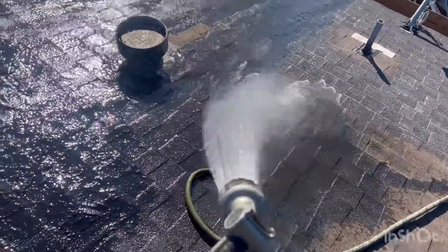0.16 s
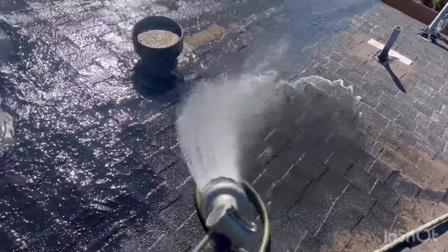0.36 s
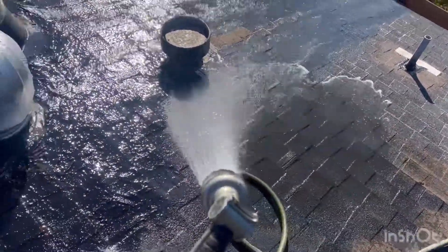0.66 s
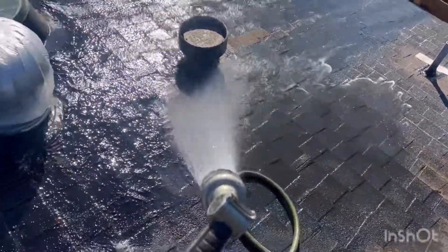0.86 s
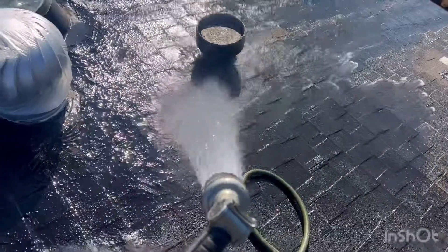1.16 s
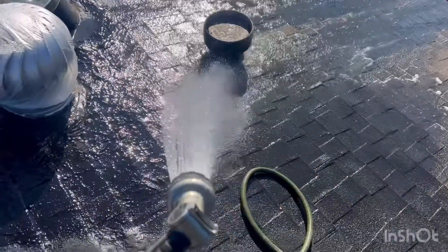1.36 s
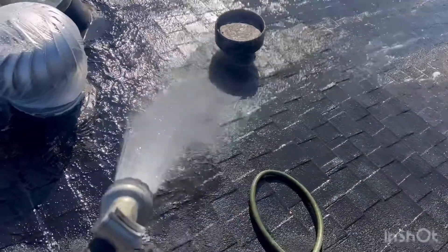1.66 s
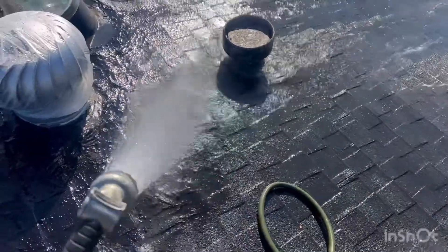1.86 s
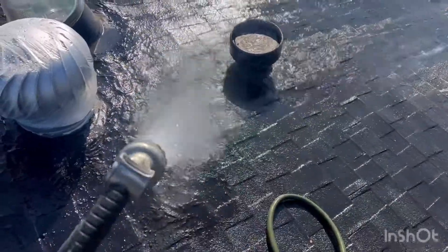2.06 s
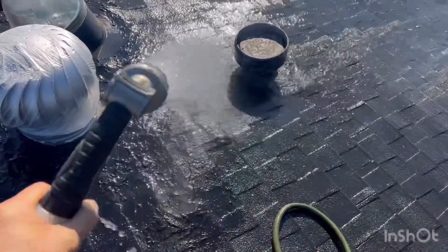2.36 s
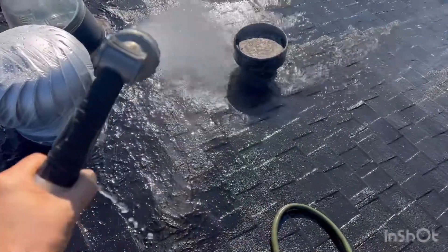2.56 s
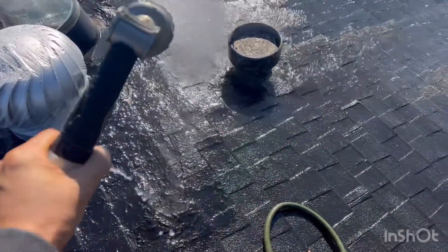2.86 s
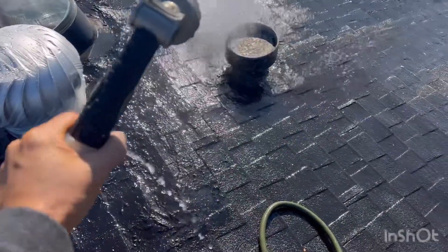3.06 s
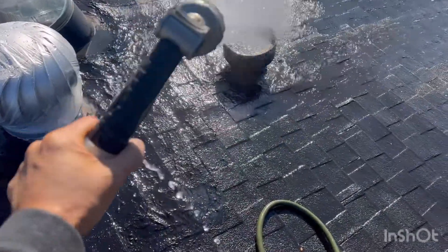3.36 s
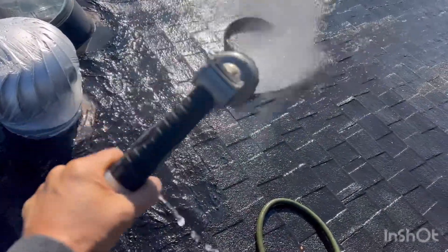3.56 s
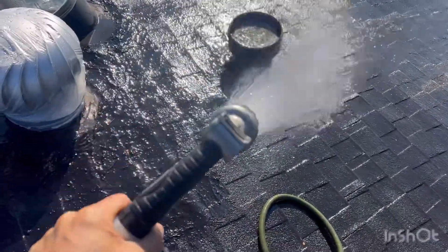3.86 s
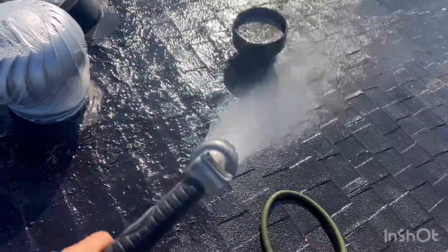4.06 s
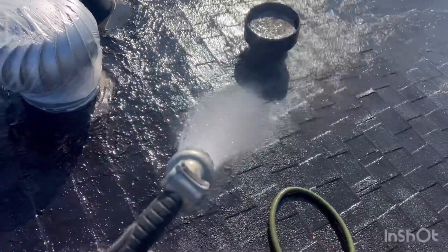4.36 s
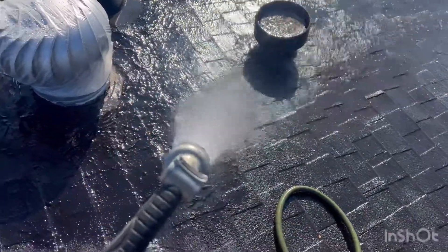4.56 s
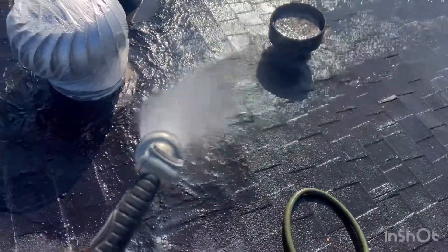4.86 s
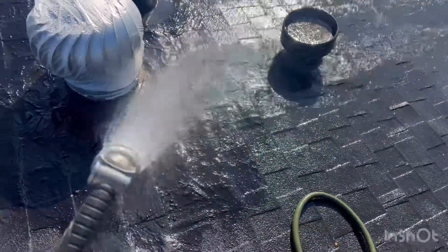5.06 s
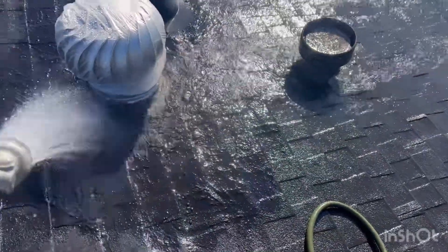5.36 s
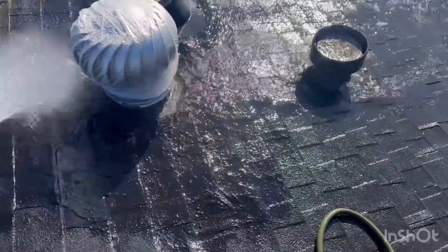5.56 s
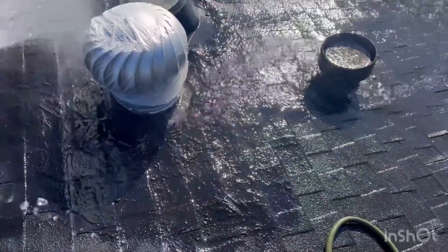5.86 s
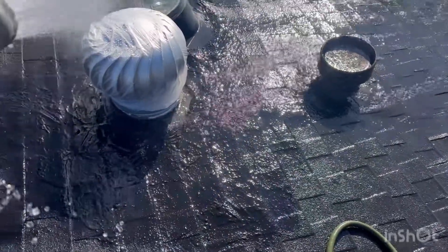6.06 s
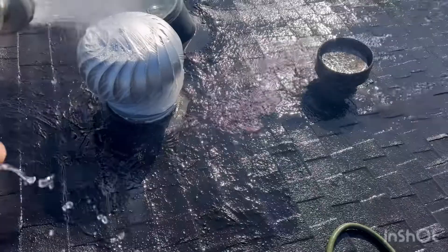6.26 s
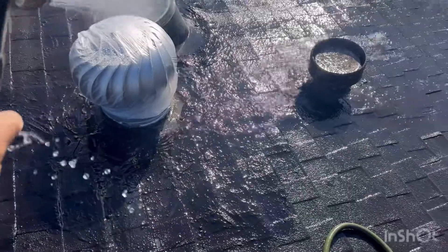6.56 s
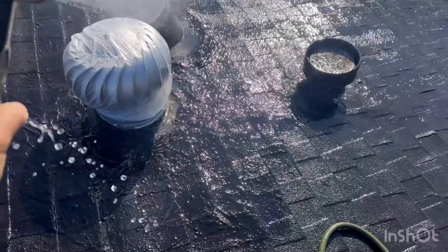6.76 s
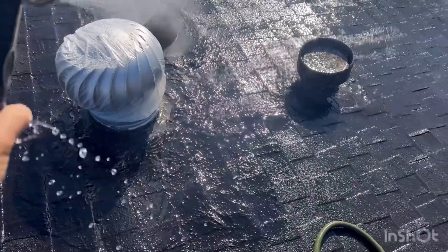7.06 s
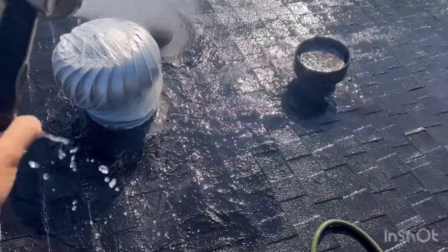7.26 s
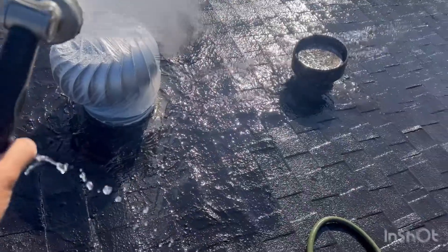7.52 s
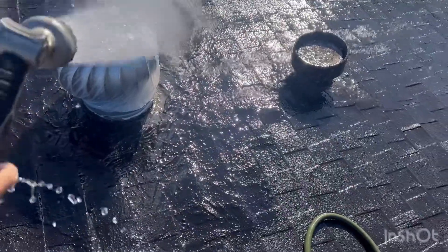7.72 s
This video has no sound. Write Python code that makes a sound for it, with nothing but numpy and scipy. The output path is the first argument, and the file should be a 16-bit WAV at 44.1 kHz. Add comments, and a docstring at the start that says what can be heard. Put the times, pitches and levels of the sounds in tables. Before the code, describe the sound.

A hose nozzle sprays water onto roof shingles outdoors, making a steady hiss close to the microphone. Its tone shifts as the spray moves, and a few stray drops tick nearby. Past the middle the hiss swings toward the left, then swells much louder as the water strikes a sheet-metal vent at the end. Soft wind bumps, a distant machine hum and low town rumble sit faintly underneath.

```python
"""Hosing down a roof

A nozzle sprays a fan of water over shingles, close to a hand-held camera with two microphone ports.
Countless droplet hits melt into a hiss that swings from straight ahead to the left, then strikes a
sheet-metal vent and swells. Stray drops tick nearby, wind bumps softly on the ports, and a distant
machine hums over low town rumble."""
import sys
import numpy as np
from scipy import signal
from scipy.fft import rfft, irfft, next_fast_len
from scipy.io import wavfile
from scipy.ndimage import uniform_filter1d

SR = 44100
rng = np.random.default_rng(int(sys.argv[2]) if len(sys.argv) > 2 else 0)


def store_wav(level_fs):
    """Save 16-bit WAV to argv[1]."""
    pcm = np.round(np.clip(np.atleast_2d(level_fs), -1, 1) * 32767)
    wavfile.write(sys.argv[1], SR, pcm.T.astype(np.int16))


N = 347949
FRAME, HOP = 512, 128  # the spray is shaped in short overlapping slices; sizes in samples


def spray():
    """Water hitting the roof: a hiss whose tone and direction follow where the nozzle points."""
    # base loudness of the hiss between 5 and 9.5 kHz: t/s, level/dB
    loudness = [(0, -41), (.35, -39), (.8, -39.5), (1.28, -41), (1.44, -38), (1.6, -42), (1.76, -41),
                (2.0, -43), (2.35, -39.5), (2.6, -41), (3.2, -43), (3.7, -43), (4.0, -38.5), (4.32, -39),
                (4.6, -41), (5.13, -39), (5.4, -34), (5.51, -39.5), (5.67, -33), (5.92, -43), (6.19, -36),
                (6.6, -40), (6.76, -38), (7.06, -43), (7.3, -38.5), (7.55, -28), (7.78, -22), (7.89, -19.5)]
    # boosts to the low, middle and top of the hiss: t/s, splash/dB, patter/dB, mist/dB
    balance = [(0, 0.5, 0.5, 0), (.45, 0.8, -3.5, -1.5), (.8, 0.5, -1, 1), (1.3, 1.5, -1, 0.5),
               (2.05, 2, -0.5, 1.5), (2.4, -2, 4, 2), (2.6, 0, 4.5, -1), (2.95, 1.5, 1, -2),
               (3.35, 4, 3, 0.5), (3.5, 5, 4.5, 0), (3.66, 3, 1.5, 0), (4.0, 0, -1, 0.5),
               (4.5, 1.5, -0.5, 1), (5.1, -1, -3, 2), (5.44, -7.5, -4.5, 2.5), (5.68, 0.2, -2.3, 1),
               (5.85, 1.5, 0.7, 2.5), (6.15, 2.5, -2, 3), (6.5, 4, 1.5, 1), (7.25, 2.1, 2, 1),
               (7.55, 0.5, 1, 4), (7.89, 0.5, 2.5, 2)]
    # where the nozzle points: t/s, aim (0 shingles ahead, 1 shingles on the left, 2 metal vent)
    aim_path = [(0, 0.02), (4.9, 0.018), (5.5, 1.34), (7.25, 1.5), (7.6, 1.98), (7.89, 1.97)]
    # how the tone shifts as the nozzle swings: t/s, whistle pitch/ratio, boost near 6.4 kHz/dB,
    # extra head start of the left port near 2.6 kHz/rad, dip centre/Hz, gain at the dip/dB
    swing = [(0, 0.97, -1, -0.36, 3000, 4.5), (.6, 0.99, -0.5, -0.041, 3100, -2.5),
             (1.45, 0.99, 0.5, 0.077, 2940, -1), (2.0, 0.96, -1, 0.61, 2660, -4.5),
             (2.4, 0.98, 2.5, 0, 2500, -3.5), (2.9, 0.95, 2, 0.48, 2250, -8),
             (3.3, 0.98, 1.5, 0, 2250, -2.5), (3.5, 1.05, 4.5, -0.041, 2300, -3),
             (3.66, 1, -3.5, -0.19, 2500, -1), (4.15, 1.04, -4, -0.43, 2800, -1), (4.6, 1, -2, 0, 2980, -3),
             (4.95, 0.97, -1, .3, 2900, -7), (5.25, 1.02, -6.5, 0.43, 2750, -8),
             (5.45, 1.06, -0.5, 0.55, 2300, -2), (6.1, 0.9, -0.3, 0.61, 2230, -0.5),
             (6.5, 0.98, 1, -0.35, 2760, -3.5), (6.9, 0.98, -1, 0, 2600, -0.5),
             (7.2, 0.97, -1.5, -.3, 2810, -6), (7.6, 1.02, -1.2, -0.016, 2650, -2.5),
             (7.89, 1.0, 2, -0.17, 2400, 0)]
    hz, t, shared_hiss = droplet_hiss(scatter_db=.2)
    right_hiss = droplet_hiss(scatter_db=2.5)[2]
    level_db = curves(loudness, t)[0]
    splash_db, patter_db, mist_db = curves(balance, t)
    aim = curves(aim_path, t)[0]
    pitch, bright_db, extra_lead, dip_hz, dip_db = curves(swing, t)

    whistle_db = -.9 + .9 * patter_db + .54 * splash_db
    # the splash boost is taken off the whistle here because the whole low end gets it below
    left, right, cross = struck_surfaces(hz, aim, whistle_db - splash_db, pitch)
    alike = cross / np.sqrt(left * right + 1e-30) * np.exp(-1j * extra_lead * bell(hz, 2600, 3000))
    apart = np.sqrt(np.clip(1 - abs(alike) ** 2, 0, 1))
    core = (hz > 5000) & (hz < 9500)
    core_power = np.sum((left + right)[core] / 2, axis=0) / (len(hz) - 1)

    low = np.clip((2200 - hz) / 500, 0, 1)[:, None]
    middle = np.clip((5800 - hz) / 1200, 0, 1)[:, None] - low
    top = np.clip((hz - 9800) / 1200, 0, 1)[:, None]
    mist_db = mist_db + np.interp(aim, range(3), (2, -1.8, -2))  # less mist once the fan points away
    balance_db = low * splash_db + middle * patter_db + top * mist_db
    swing_db = bell(hz, 6400, 2600) * bright_db + bell(hz, dip_hz, 670) * dip_db
    passing_db = turning_sweep(hz, t) + pipe_ring(hz, t)
    gain = undb(level_db + balance_db + swing_db + passing_db + fan_flicker(hz, t)) / np.sqrt(core_power)
    at_left = np.sqrt(left) * shared_hiss
    at_right = np.sqrt(right) * (alike * shared_hiss + apart * right_hiss)
    pair = gain * np.array([at_left, at_right])
    return signal.istft(pair, SR, nperseg=FRAME, noverlap=FRAME - HOP)[1][:, :N]


def droplet_hiss(scatter_db, large_per_s=170):
    """Tiny uneven hits blur into hiss as larger ones patter through. Gives frequencies, times, slices."""
    hits = rng.standard_normal(N) * undb(scatter_db * wander(900, (1, N))[0])
    is_large = rng.random(N) < large_per_s / SR
    large_db = 11 + 7 * rng.random(N)
    hits = np.where(is_large, np.sign(hits) * undb(large_db), hits)
    return signal.stft(hits / hits.std(), SR, nperseg=FRAME, noverlap=FRAME - HOP)


def struck_surfaces(hz, aim, whistle_db, pitch):
    """Each surface colours the hiss its own way; the aim blends their left, right and shared power."""
    # tone of each surface at the two ports: f/Hz, left/dB, right/dB, likeness (0 to 1)
    ahead_tone = [(250, -2, 2.5, 0), (452, -1.5, -3.5, 0.17), (780, -7.5, -3.5, 0.4),
                  (1350, -4, -2.5, 0.93), (1770, -6.5, -3, 0.6), (2400, -2, 0, 0.55),
                  (2980, -3, -3.5, 0.07), (3900, -3.5, -5.5, 0.6), (4930, -3.5, -6.5, 0.67),
                  (5500, -1.5, -4.5, 0), (6450, -2.5, -3.5, 0.7), (7760, 3, 2.5, 0.02),
                  (8450, 2.5, 1.5, 0.86)]
    left_tone = [(250, 1.5, 2, 0.71), (465, -3.5, -5.5, 0.21), (800, -2.5, -4, 0.65), (1390, 2, 2.5, 0.68),
                 (1800, -2, 2.5, 1), (2390, -3.5, -3.5, 0.49), (3080, -2.5, -4, 0.85), (3900, -1, -8, 0.37),
                 (4730, -0.5, -5, .29), (5400, 1.5, -11, 0.2), (6250, 1, -1, 0.47), (7850, 2.5, 2.5, 0.49),
                 (8550, 4.5, -0.5, 0.89)]
    vent_tone = [(190, -3.5, -6, 0.99), (437, -0.5, -3, 0.99), (670, -7, -6, 0.93), (1410, -2.5, -2, 0.9),
                 (1800, -14.5, -6.5, 0.89), (2390, -3, -3, 0.7), (3070, 3, -4, 0.76),
                 (3820, -4.5, -10, 0.48), (4700, -1.5, -15, .45), (5500, 0, -6.5, 0.51),
                 (6400, -0.5, -1, 0.82), (7600, -0.5, 1, 0.74), (8200, 1, -4.5, 0.94)]
    # pitches that the hiss sets ringing, the nozzle's whistle first: f/Hz, width/Hz, boost/dB
    ahead_rings = [(1382, 276, 9.5), (2510, 100, -2.5), (5870, 1100, 1.5)]
    left_rings = [(1440, 250, 5.4), (1980, 250, 3), (2530, 116, 12.7), (3000, 430, 6.4), (3570, 180, 5),
                  (7700, 350, 1)]
    vent_rings = [(1554, 154, 11.5), (2010, 370, 11.5), (2780, 490, 0.5), (3120, 300, 1), (3640, 180, 4),
                  (4470, 460, 3), (5880, 290, 3.5), (6500, 250, 1), (6840, 250, 1), (7570, 500, 3),
                  (8140, 250, 4), (8900, 1060, 7)]
    # head start of the wave at the left port: f/Hz, spray ahead/rad, spray on the left/rad
    head_start = [(250, -.4, 0), (800, -.4, .3), (1400, .4, 1.2), (2050, .5, 2.1), (2400, .8, 2.9),
                  (3100, 1.6, 3.5), (3900, 1.3, 6.1), (4700, .3, 5.5), (5500, .3, 5.1), (6400, .1, 6),
                  (7500, .8, 7), (8400, 0, 6.28)]
    from_ahead, from_left = curves(head_start, hz)
    surfaces = [(ahead_tone, ahead_rings, from_ahead), (left_tone, left_rings, from_left),
                (vent_tone, vent_rings, from_left)]
    blend = 0
    for k, (tone, rings, lead) in enumerate(surfaces):
        share = np.clip(1 - abs(aim - k), 0, 1)
        blend = blend + share * power_at_ports(hz, tone, rings, lead, whistle_db, pitch)
    left, right, cross = blend
    return left.real, right.real, cross


def power_at_ports(hz, tone, rings, lead, whistle_db, pitch, treble_lag_s=1 / 3600):
    """One surface's left, right and shared (cross) power; its treble is one signal, with the right channel
    slightly ahead of the left."""
    # the ports' own resonance and the treble above it: f/Hz, gain/dB
    treble = [(8400, 0), (9000, 1.3), (9600, -.7), (10100, -3.8), (10600, -8.5), (11100, -11.5),
              (11800, -13.5), (12800, -13), (14000, -10), (15000, -7.3), (16000, -6.5)]
    f, left_db, right_db, likeness = np.transpose(tone)
    above_hz = np.maximum(hz - f[-1], 0)  # how far past the tone table's last row
    most_alike = np.where(above_hz > 0, .9, 1)
    alike = np.clip(np.interp(hz, f, likeness) + above_hz / 9000, 0, most_alike)
    lead = lead - 2 * np.pi * above_hz * treble_lag_s
    # the treble evens out to the same level at both ports
    even_db = np.clip(above_hz / 600, 0, 1) * (left_db[-1] - right_db[-1]) / 2
    left = undb(np.interp(hz, f, left_db) - even_db)
    right = undb(np.interp(hz, f, right_db) + even_db)
    cross = left * right * alike * np.exp(-1j * lead)
    whistle_hz, whistle_width, rest_db = rings[0]
    rings_db = sum(db * bell(hz, centre, width) for centre, width, db in rings[1:])
    rings_db = rings_db + (rest_db + whistle_db) * bell(hz, whistle_hz * pitch, whistle_width)
    treble_db = curves(treble, hz)[0][:, None]
    bass_cut = (hz ** 2 / (hz ** 2 + f[0] ** 2))[:, None]
    power = undb(treble_db + rings_db) ** 2 * bass_cut
    return power * np.array([left ** 2, right ** 2, cross])[:, :, None]


def fan_flicker(hz, t):
    """As the fan of water wavers, patches of the hiss grow louder and softer at random (in dB)."""
    step_s = HOP / SR
    centres_hz = np.arange(17) * 1000
    patches = np.clip(1 - abs(hz[:, None] - centres_hz) / 1000, 0, 1)
    size = (len(centres_hz), len(t))
    flicker_db = patches @ (.6 * wander(24, size, step_s) + 1.5 * wander(70, size, step_s))
    flicker_db *= np.interp(hz, (6500, 8000), (.6, 1))[:, None]  # calmer below about 7 kHz
    # narrow bands above 2.5 kHz drift slowly as the jet moves
    band = np.minimum(hz // 400, 40).astype(int)
    drift = uniform_filter1d(wander(3, (41, len(t)), step_s)[band], 3, axis=0)
    drift_db = 1.1 * drift * (hz > 2500)[:, None]
    overall_db = .35 * wander(28, (1, len(t)), step_s)
    return flicker_db + drift_db + overall_db


def turning_sweep(hz, t, width_hz=1200, dark_offset_hz=980):
    """While the fan turns left, a bright band slides down with a dark band just above it (in dB)."""
    # path of the bright band: t/s, f/Hz, strength/dB
    slide = [(5.05, 8650, 2), (5.18, 8200, 0), (5.27, 7750, 3), (5.36, 7100, 4), (5.46, 6140, 2),
             (5.6, 5900, 0)]
    centre_hz, db = curves(slide, t)
    return db * (bell(hz, centre_hz, width_hz) - bell(hz, centre_hz + dark_offset_hz, width_hz))


def pipe_ring(hz, t, middle_s=3.54, length_s=.22, boost_db=6):
    """The fan crosses a vent pipe, which rings briefly and lifts one narrow band (in dB)."""
    crossing = np.exp(-(2 * (t - middle_s) / length_s) ** 2)
    return boost_db * bell(hz, centre=2620, width=200) * crossing


def stray_drops():
    """Each drop is a short ring with a bright crack on top, then a bounce off the shingles."""
    # single drops: t/s, level/dB, f/Hz, time to fade by 60 dB/ms, bounce delay/ms, bounce gain/dB,
    # left minus right/dB
    drops = [(0.306, -21, 7400, 1.5, .65, -8, 5), (1.5536, -13.5, 6800, 1.5, .65, -17, 6),
             (1.6156, -29, 5900, 2.1, .65, -8, 2.5), (2.0663, -25, 1280, 2.2, 1.1, -10, -5),
             (2.385, -33, 1900, 6, 1.05, -5, -1), (2.425, -32, 3300, 5, .8, -5, 0),
             (2.452, -32, 1000, 3.5, 0.61, -4, -2), (2.5018, -30.5, 1600, 3.2, 1.1, -3, -3),
             (2.572, -38, 1300, 3.5, 0.95, -6, -1), (2.975, -28, 5200, 2, .65, -8, 2.5),
             (3.174, -33, 1100, 3.5, 0.82, -8, -1), (3.6859, -21.5, 3070, 3.1, 1.2, -1, 0.5),
             (4.0718, -33, 8300, 2, .65, -8, 3), (4.282, -12.5, 6830, 2.3, 0.67, -1.5, 4),
             (4.5533, -29, 7860, 2, .65, -8, 3), (4.6573, -25, 7800, 2.5, 0.65, -4, 4),
             (4.997, -36, 2300, 4, .9, -8, 0), (5.177, -34, 5200, 3.5, .75, -10, 4),
             (5.395, -32, 4400, 3, .7, -8, 6), (5.5363, -26.5, 4500, 1.5, 0.75, -10, 12),
             (7.0078, -27, 4100, 2.4, 0.58, -12, 4), (7.1176, -31, 8000, 1.8, 0.61, -1, -8)]
    out = np.zeros((2, N))
    ms = np.arange(int(.012 * SR)) / SR * 1000
    crack = .45 * np.exp(-ms / .12) * np.sin(2 * np.pi * 10.5 * ms)  # 10.5 kHz
    for start_s, level_db, hz, fade_ms, bounce_ms, bounce_db, pan_db in drops:
        cycles = hz * ms / 1000
        envelope = (1 - np.exp(-1.5 * cycles)) * np.exp(-np.log(1000) * ms / fade_ms)
        ring = envelope * np.sin(2 * np.pi * cycles)
        hit = ring / abs(ring).max() + crack
        bounce = undb(bounce_db) * np.interp(ms - bounce_ms, ms, hit, left=0)
        at = int(start_s * SR)
        out[:, at:at + len(ms)] += undb(level_db) * pan(pan_db) * (hit + bounce)
    return out


def wind_bumps():
    """Wind nudges both ports alike, making soft low pulses of a few cycles."""
    # puffs of wind: middle t/s, peak level/dB, f/Hz, length/ms
    puffs = [(1.086, -41, 75, 34), (1.275, -37, 68.4, 55), (1.385, -42, 56, 62), (1.95, -42, 75, 29),
             (2.103, -42, 75, 30), (2.218, -39, 70, 19), (2.248, -42, 70, 20), (2.29, -38, 55, 30),
             (2.44, -43, 60, 26), (2.479, -37, 85, 19)]
    t = np.arange(N) / SR
    out = np.zeros(N)
    for middle_s, peak_db, hz, length_ms in puffs:
        envelope = np.exp(-(2000 * (t - middle_s) / length_ms) ** 2)
        out += undb(peak_db) * envelope * np.cos(2 * np.pi * hz * (t - middle_s))
    return out


def machine_hum():
    """A distant turning shaft hums at four multiples of its speed; each tone wavers on its own."""
    # the shaft slowing a little: t/s, turning rate/Hz
    shaft_speed = [(0, 41.56), (2.9, 40.74), (5.5, 40.44), (7.89, 39.58)]
    # loudness of the tones at 3, 6, 8 and 9 times that rate: t/s, then level/dB for each
    tone_levels = [(0, -47.5, -64, -51.5, -48.5), (.25, -48.5, -59.5, -57, -51.5), (.4, -51, -50, -54, -57),
                   (.9, -55, -53.5, -57, -59.5), (1.25, -59, -61, -58.5, -57), (1.6, -60, -51.5, -74, -68),
                   (2.1, -54, -59.5, -62, -64), (2.55, -58, -67, -70, -68), (2.85, -66, -57, -72, -71),
                   (3.15, -56.5, -56, -59.5, -58), (3.6, -51.5, -51, -67, -66),
                   (4.8, -54, -54, -56.5, -57.5), (5.2, -58, -60, -62, -71), (6.0, -56, -67, -63, -63),
                   (6.25, -56, -57.5, -66, -51), (6.7, -57, -64, -65, -60.5),
                   (7.34, -47.5, -63, -61, -57.5), (7.89, -52.5, -48.5, -60, -54)]
    multiples = np.array([3, 6, 8, 9])[:, None]
    wobble = np.array([.005, .004, .008, .016])[:, None]  # as a share of each tone's pitch
    t = np.arange(N) / SR
    size = (len(multiples), N)
    tone_hz = multiples * curves(shaft_speed, t)[0] * (1 + wobble * wander(12, size))
    phase = 2 * np.pi * np.cumsum(tone_hz, axis=1) / SR
    fading_db = .7 * wander(2.5, size)
    flutter_db = 1.1 * wander(10, size)
    level_db = np.array(curves(tone_levels, t)) + fading_db + flutter_db
    return np.sqrt(2) * np.sum(undb(level_db) * np.sin(phase), axis=0)


def town_rumble(throb_hz=82.8, throb_width_hz=14.7, stereo_spread=.23):
    """Low town noise, nearly the same at both ports: a deep swell, a steady part and a narrow throb."""
    # how the town swells and fades: t/s, deep rumble/dB, throb/dB
    swells = [(0, -59, -48.5), (1.25, -48.5, -52.5), (1.8, -52, -56), (2.31, -48, -58),
              (2.72, -54.5, -53.5), (4.8, -58, -52.5), (5.2, -56, -47), (6.5, -55, -45.5), (7.89, -62, -46)]
    # tone of the rumble: f/Hz, relative level/dB
    rumble_tone = [(15, -38), (25, -20), (55, 2), (100, -5), (135, -2.5), (190, -8.5), (260, -11.5),
                   (400, -10), (700, -23), (1000, -19)]
    deep_db, throb_db = curves(swells, np.arange(N) / SR)
    size = next_fast_len(N)
    hz = np.arange(size // 2 + 1) * SR / size + 1e-3
    f, db = np.transpose(rumble_tone)
    colour = undb(np.interp(np.log(hz), np.log(f), db, right=-120))
    deep_share = 1 / (1 + (hz / 86.8) ** 4)
    throb_band = np.exp(-((hz - throb_hz) / throb_width_hz) ** 2)
    shapes = np.array([colour * deep_share, colour * (1 - deep_share), throb_band])
    mid, side = irfft(rfft(rng.standard_normal((2, 3, size))) * shapes, size)[..., :N]
    pair = np.array([mid + stereo_spread * side, mid - stereo_spread * side])
    pair /= mid.std(axis=1)[[0, 0, 2], None]  # the steady part is scaled against the deep part
    deep, steady, throb = pair.swapaxes(0, 1)
    return deep * undb(deep_db) + steady * undb(-53.5) + throb * undb(throb_db)


def undb(db):
    """Turn decibels into a plain multiplier."""
    return 10 ** (np.asarray(db) / 20)


def pan(db):
    """Left and right multipliers that make the left side db louder than the right."""
    return undb([[db / 2], [-db / 2]])


def curves(table, at):
    """Join a table's rows with straight lines: one curve for each column after the first."""
    points, *columns = np.transpose(table)
    return [np.interp(at, points, column) for column in columns]


def bell(hz, centre, width):
    """A smooth hump of height 1 around a centre frequency, one row for each frequency."""
    return np.exp(-4 * ((hz[:, None] - centre) / width) ** 2)


def wander(rate, size, step_s=1 / SR):
    """Rows of smooth random drift, about 1 in size, with a new goal `rate` times a second."""
    hold = max(int(1 / (rate * step_s)), 1)
    goals = rng.standard_normal((size[0], size[1] // hold + 1))
    held = np.repeat(goals, hold, axis=1)[:, :size[1]]
    return np.sqrt(2) * uniform_filter1d(uniform_filter1d(held, hold), hold)


def scene():
    """Water and wind up close, with the town and the machine far off and a little to the left."""
    near = spray() + stray_drops() + wind_bumps()
    far = town_rumble() + machine_hum()
    return near + far * pan(1.8)


def record(dry, top_hz=15700):
    """The camera cuts off the highest treble."""
    return signal.sosfilt(signal.ellip(20, .2, 110, top_hz, fs=SR, output="sos"), dry)


dry = scene()
out = record(dry)
store_wav(out)
```